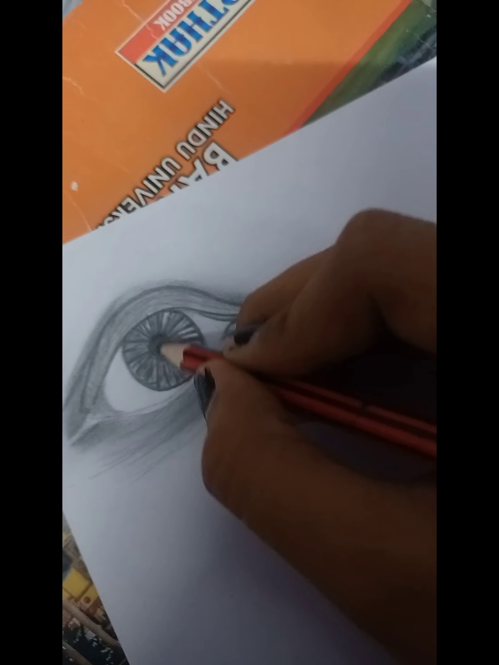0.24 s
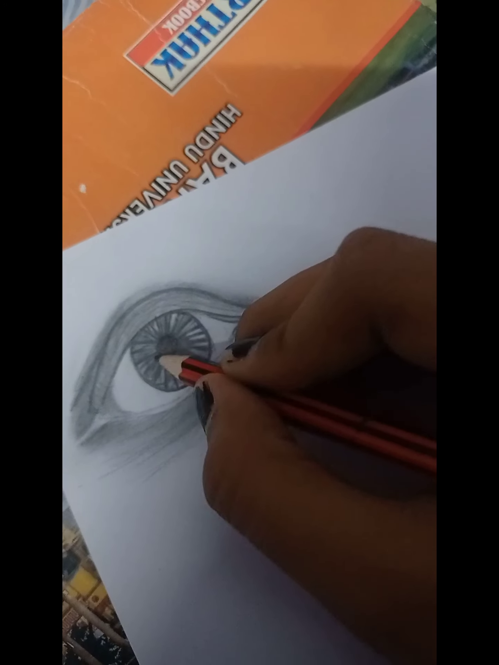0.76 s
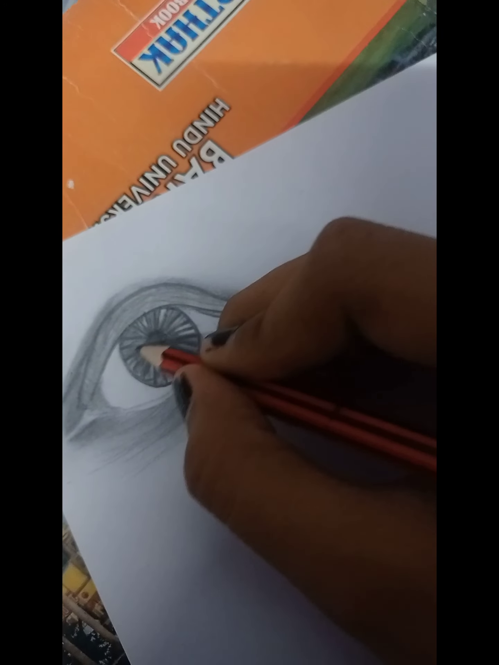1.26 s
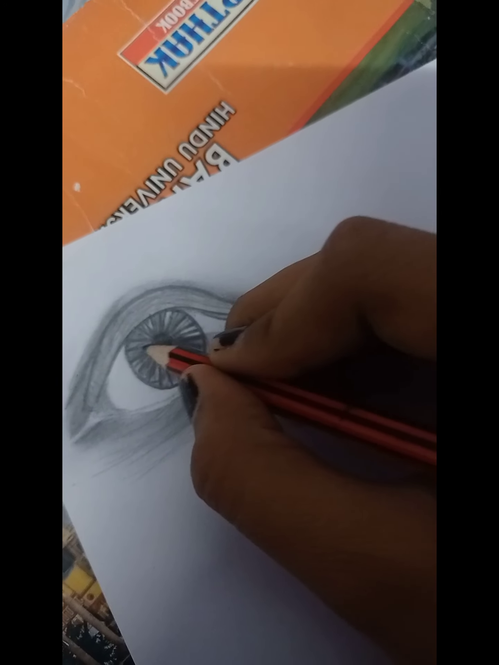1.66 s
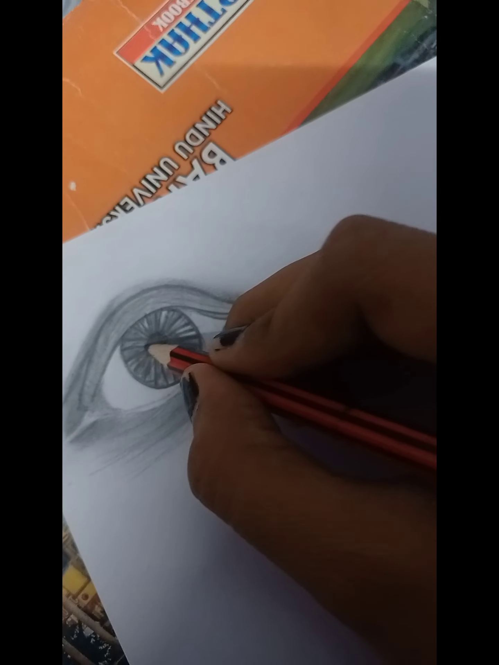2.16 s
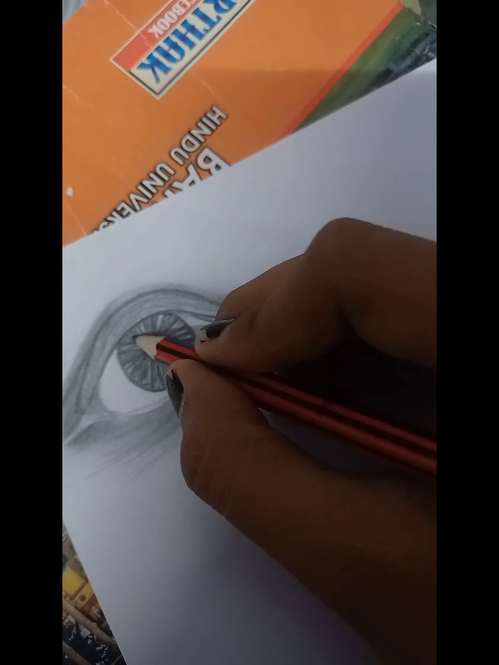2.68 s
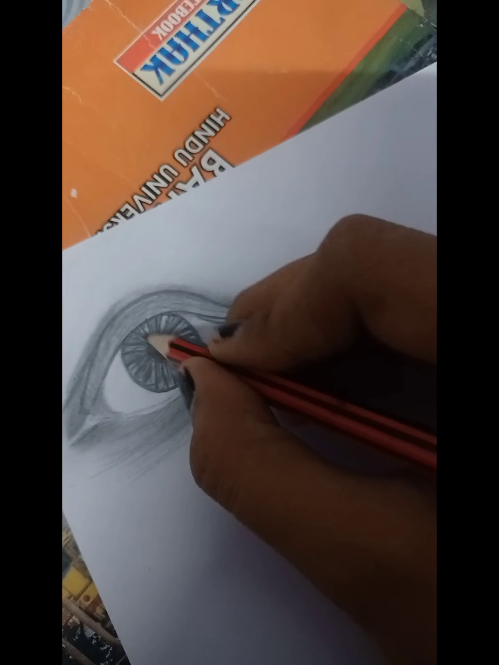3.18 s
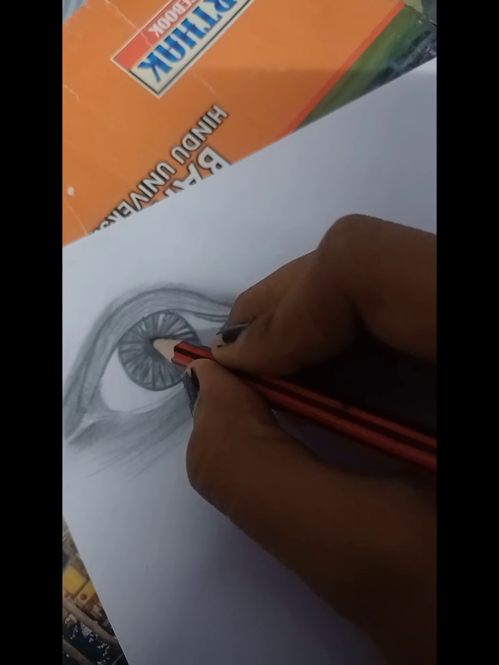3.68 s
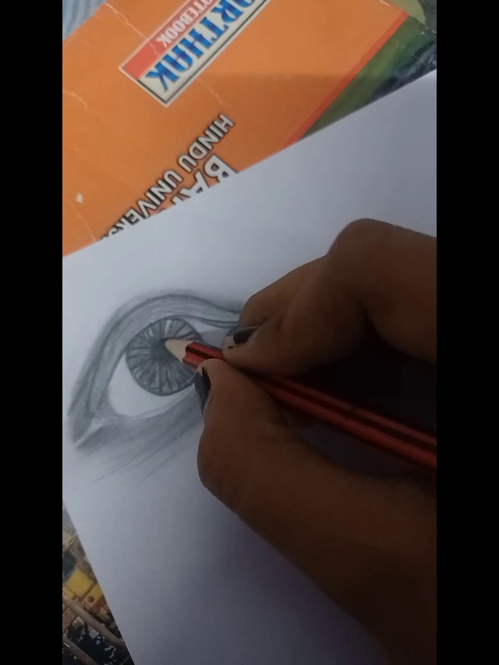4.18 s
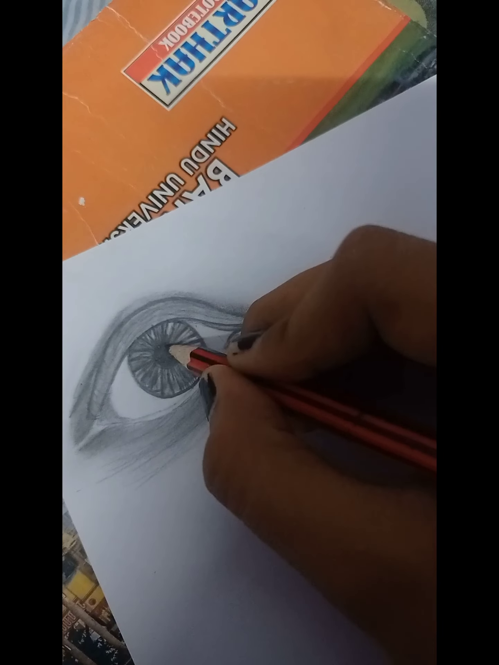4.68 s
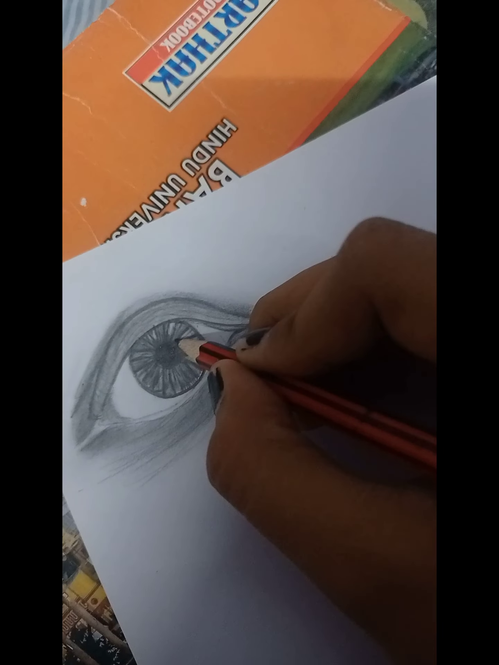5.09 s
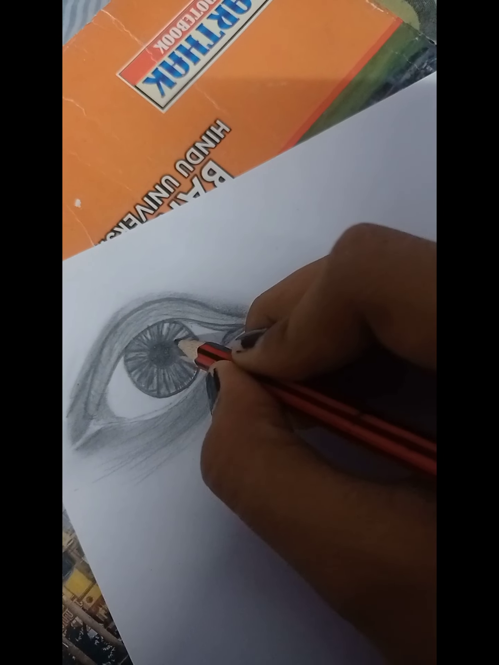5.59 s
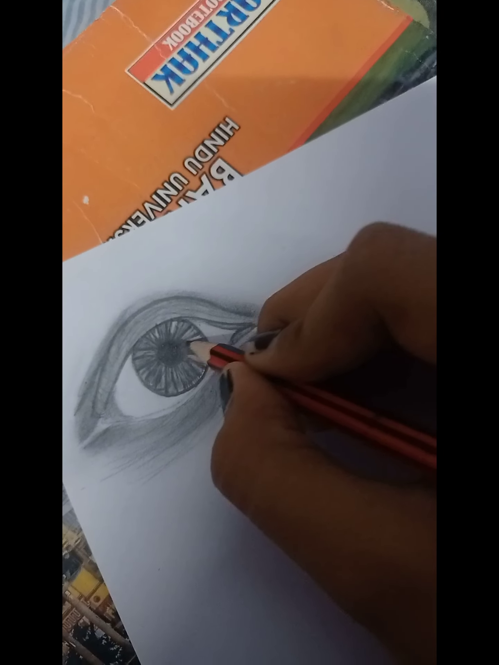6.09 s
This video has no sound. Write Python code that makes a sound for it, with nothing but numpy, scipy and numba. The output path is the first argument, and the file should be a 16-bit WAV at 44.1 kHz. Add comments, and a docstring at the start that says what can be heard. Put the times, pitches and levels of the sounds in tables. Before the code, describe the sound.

A fan runs throughout in a room, its low motor hum nearly constant in pitch, with a strong overtone an octave up and a gentle, dull rush of blade air topped by faint hiss. The draught blows straight onto the microphone. From 0 to 0.4 seconds it buffets hard, with deep rumbling and a cluster of sharp, overloading slaps around 0.2 that momentarily push the fan's level down. Thumps continue near 0.9, 1.4 and 1.5, then a stronger pair with slaps lands around 1.9. After 2.2 the air calms, leaving the hum and rush clear, with only small low puffs near 2.7, 3.0, 3.2, 3.6 and 4.1. Dull gusts return from 4.9 to 5.2, another soft one comes near 5.7, and heavier rumbling builds from 6.0 to a hard thump and slap at 6.3, just before the end.

```python
"""An electric fan runs in a room: its motor hums near 107 Hz and its blades rush steadily.
The hum is a stack of sine waves; the rush and a faint hiss are coloured noise.
The fan's draught reaches the microphone: noise makes an uneven rumble and the dull thumps of gusts,
and short pressure pulses make sharp slaps. The strongest briefly push the recorder's gain down."""
import sys
import numpy as np
from scipy import signal
from scipy.fft import rfft, irfft
from scipy.io import wavfile
from scipy.ndimage import uniform_filter1d, minimum_filter1d, map_coordinates
from numba import njit

SR = 44100
rng = np.random.default_rng(int(sys.argv[2]) if len(sys.argv) > 2 else 0)


def log_audio(samples):
    """Write samples as a 16-bit WAV file to the path given in sys.argv[1]."""
    # one column per channel
    frames = np.atleast_2d(samples).T
    # limit to full scale, then quantise
    limited = np.clip(frames, -1, 1)
    pcm = np.round(limited * 32767).astype(np.int16)
    wavfile.write(sys.argv[1], SR, pcm)


N = 279946  # length in samples
TIME = np.arange(N) / SR  # seconds

# Colour of the buffeting air, used by the draught and the gusts.
# Each row: frequency in Hz, relative level in dB per Hz.
BUFFET = [(20, -34.5), (35, -21.5), (52, -9.5), (72, 1), (105, 3.5), (160, -1), (250, -7.5), (350, -24),
          (480, -35)]


def undb(db):
    """Turn decibels into a gain."""
    return 10 ** (np.asarray(db) / 20)


def curve(rows):
    """Join rows of (seconds, value) by straight lines."""
    return np.interp(TIME, *np.transpose(rows))


def noise(spectrum):
    """Noise of rms 1 with the given colour, falling 24 dB per octave beyond its ends."""
    hz, db = np.transpose(spectrum)
    octave = np.log2(np.maximum(np.fft.rfftfreq(N, 1 / SR), 1))
    nearest = np.clip(octave, np.log2(hz[0]), np.log2(hz[-1]))
    octaves_outside = np.abs(octave - nearest)
    gain = undb(np.interp(octave, np.log2(hz), db) - 24 * octaves_outside)
    coloured = irfft(rfft(rng.standard_normal(N)) * gain, N)
    return coloured / coloured.std()


def walk(rate):
    """Smooth random curve of spread 1 that heads for a new value rate times a second."""
    steps = rng.standard_normal(1024)
    joined = np.interp(TIME * rate, np.arange(len(steps)), steps)
    smooth = uniform_filter1d(joined, int(SR / rate / 2))
    return smooth / smooth.std()


def hum(drift=0.22):
    """Motor hum: sine waves at multiples of one pitch, each wavering in the moving air."""
    # Motor speed. Each row: time in seconds, pitch of the hum in Hz.
    motor_pitch = [(0, 106.2), (.8, 105.8), (1.8, 106.1), (2.8, 106.75), (4.6, 106.8), (5.5, 106.55),
                   (6.35, 106.7)]
    # Sine waves of the hum. Each row: multiple of the pitch, middle rms level in dB, size of the waver in dB.
    hum_partials = [(1, -34, 1.5), (2, -29.5, 1), (3, -42, 2), (5, -65.5, 7), (6, -68, 6.5),
                    (7, -61.5, 3.5), (10, -58.5, -2.5)]
    phase = 2 * np.pi * np.cumsum(curve(motor_pitch)) / SR
    out = 0
    for multiple, db, waver_db in hum_partials:
        # drift is in radians per dB of waver
        shift = 2 * np.pi * rng.random() + drift * waver_db * walk(6.1)
        gain = np.sqrt(2) * undb(db + waver_db * walk(6.5))  # root 2 turns rms into peak
        out = out + gain * np.sin(round(multiple) * phase + shift)
    return out


def blades(rush_db=-35.0, sway_db=1.53, hiss_db=-68):
    """Rush of air off the blades: each part of its range sways on its own, with a smooth hiss."""
    # Colour of the rush in the room. Each row: frequency in Hz, relative level in dB per Hz.
    rush_colour = [(170, 10.5), (325, 14), (420, 9), (500, -1), (860, -1.5), (1060, 1.5), (1230, -2.5),
                   (1600, 0), (2000, -0.5), (2400, -3.5), (3400, -13.5), (3720, -14), (4100, -20),
                   (6000, -32.5)]
    # Colour of the faint top hiss. Each row: frequency in Hz, relative level in dB per Hz.
    hiss_colour = [(4000, -8), (6200, -5), (7200, 1), (8200, 4), (9700, -7.5), (12500, -11.5), (13500, -7),
                   (15500, -7)]
    air = rfft(noise(rush_colour))
    octave = np.log2(np.clip(np.fft.rfftfreq(N, 1 / SR), 250, 4000) / 250)  # counted from 250 Hz
    rush = 0
    for centre in np.arange(9) / 2:
        share = np.maximum(0, 1 - 2 * np.abs(octave - centre))  # overlapping half-octave bands
        band = irfft(air * share, N)
        rush = rush + band * undb(sway_db * walk(19))
    hiss = noise(hiss_colour) * undb(hiss_db + .5 * walk(8))
    return rush * undb(rush_db) + hiss


def draught(rumble_db=9, churn_db=3.0):
    """Low rumble of air that churns over the microphone port: noise with an uneven level."""
    # Strength of the draught. Each row: time in seconds, rumble level in dB before rumble_db is added.
    draught_level = [(0.0, -27.5), (0.44, -41), (0.83, -39), (1.17, -44.5), (1.77, -32), (2.35, -40.5),
                     (3.98, -51.5), (4.1, -42), (4.51, -51.5), (5.04, -39.5), (5.62, -49), (6.35, -30)]
    level_db = curve(draught_level) + rumble_db + churn_db * walk(22)
    return noise(BUFFET) * undb(level_db)


def gusts(thump_db=0.5, spread=0.98):
    """Each gust is a short swell of low rumble; the harder it blows, the more fine turbulence it carries."""
    # Gusts that hit the microphone. Each row: middle in seconds, rumble level in dB before thump_db is added,
    # half length in seconds before spread scales it, centre of the rumble in Hz.
    gust_list = [(0.038, -17.5, 0.091, 104.7), (0.183, -10.5, 0.017, 114.5), (0.228, -6.5, 0.017, 151),
                 (0.347, -11.5, 0.019, 125), (0.412, -17.5, 0.041, 145), (.56, -21, 0.039, 109.5),
                 (0.801, -23, 0.02, 99.5), (0.892, -16.5, 0.024, 121), (0.975, -13, 0.036, 119.4),
                 (1.357, -18, 0.022, 118), (1.522, -18, 0.026, 134.6), (1.752, -20, 0.1, 104.7),
                 (1.885, -13, 0.019, 125.5), (1.947, -15, .027, 105.3), (2.107, -19, 0.032, 119.7),
                 (2.214, -24.5, .035, 106), (2.692, -26, 0.02, 125), (2.97, -21, 0.017, 135),
                 (3.17, -18.5, 0.016, 133), (3.557, -24.5, 0.018, 152), (4.066, -25, 0.052, 91),
                 (4.878, -19.5, 0.021, 79), (5.041, -18, 0.027, 102), (5.233, -19, .035, 89.4),
                 (5.672, -23.5, 0.036, 115.3), (5.985, -15, 0.015, 119), (6.116, -15, 0.048, 110),
                 (6.207, -20.5, 0.06, 125), (6.311, -10.5, 0.034, 133.6)]
    # Colour of the fine turbulence. Each row: frequency in Hz, relative level in dB per Hz.
    flutter_colour = [(160, -1), (250, 1), (340, -3.5), (480, -13.5), (700, -22.5), (1000, -35.5),
                      (1500, -50.5)]
    buffet_hz = 109.93  # centre of the rumble at its normal speed
    hard_gust_db = -9.5  # rumble of a hard gust, before thump_db
    flutter_db, flutter_growth = -18.5, 1.28  # turbulence in a hard gust; dB it gains per dB of rumble

    coarse, fine = noise(BUFFET), noise(flutter_colour)
    out = np.zeros(N)
    for s, rumble_db, length, centre_hz in gust_list:
        near = np.abs(TIME - s) < .2
        t = TIME[near] - s
        swell = np.exp(-(t / (spread * length)) ** 2)
        weight = swell ** 2 / np.sum(swell ** 2)
        # smaller eddies sweep over the port faster: reading the noise faster lifts its pitch
        read_at = (s + t * centre_hz / buffet_hz) * SR
        rumble = map_coordinates(coarse, [read_at], order=1, mode="mirror")
        fine_db = flutter_db + flutter_growth * (rumble_db - hard_gust_db)
        for air, db in ((rumble, rumble_db + thump_db), (fine[near], fine_db)):
            # the gust's strength sets the energy of its swell
            rms = np.sqrt(np.sum(weight * air ** 2))
            out[near] += air * swell * undb(db) / rms
    return out


def slaps(slap_db=-1, bass_cut_hz=115):
    """Single pressure pulses; the microphone's bass cut turns each into a few slowing swings."""
    # Sharp slaps where the air breaks over the port. Each row: time in seconds,
    # peak level in dB before slap_db is added, half width of the pulse in seconds.
    slap_list = [(0.1808, 5.5, 0.00054), (0.2107, -1, 0.00043), (0.2164, 2, 0.00042), (0.2231, -1, 0.00084),
                 (0.3425, -6.5, 0.0011), (0.385, -10, 0.00066), (0.5665, -11, 0.00048),
                 (0.7966, -13.5, 0.00036), (.9879, -11.5, 0.00058), (1.504, -15, 0.00046),
                 (1.9169, -6, 0.00054), (1.942, -7, 0.00076), (4.8697, -12, 0.00059), (6.3045, -6, 0.00059)]
    bass_cut = signal.butter(4, bass_cut_hz, "high", fs=SR, output="sos")
    out = np.zeros(N)
    for s, db, width in slap_list:
        near = np.abs(TIME - s) < .06
        pulse = np.exp(-.5 * ((TIME[near] - s) / width) ** 2)
        swing = signal.sosfilt(bass_cut, pulse)
        out[near] += swing * undb(db + slap_db) / np.abs(swing).max()
    return out


def scene():
    """Add up the fan and its draught at one microphone."""
    return (hum() + blades() + draught() + gusts() + slaps())[None]


@njit
def follow(x, attack, release):
    """Follow the loudness of x, rising fast and falling slowly."""
    out, level = np.empty(len(x)), 0.
    for i in range(len(x)):
        size = abs(x[i])
        level += (size - level) * (attack if size > level else release)
        out[i] = level
    return out


def record(dry, limit_db=-4.5, ratio=5, attack_s=0.00066, release_s=0.22, top_hz=15720):
    """A limiter turns everything down when the level passes its limit, then recovers; the top is cut."""
    envelope = follow(dry[0], 1 / (attack_s * SR), 1 / (release_s * SR))
    gain = np.minimum(1, undb(limit_db) / (envelope + 1e-9)) ** (1 - 1 / ratio)
    # start each dip a little early and round its edges
    gain = uniform_filter1d(minimum_filter1d(gain, size=256), size=256)
    top_cut = signal.ellip(10, .2, 80, top_hz, fs=SR, output="sos")
    return signal.sosfilt(top_cut, dry * gain)


dry = scene()
out = record(dry)
log_audio(out)
```